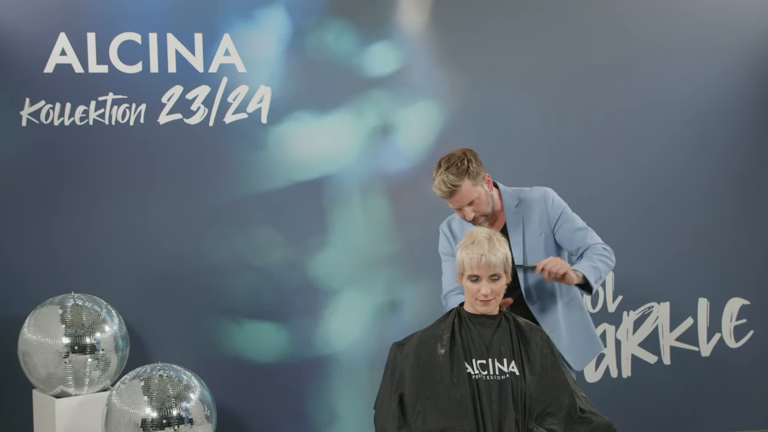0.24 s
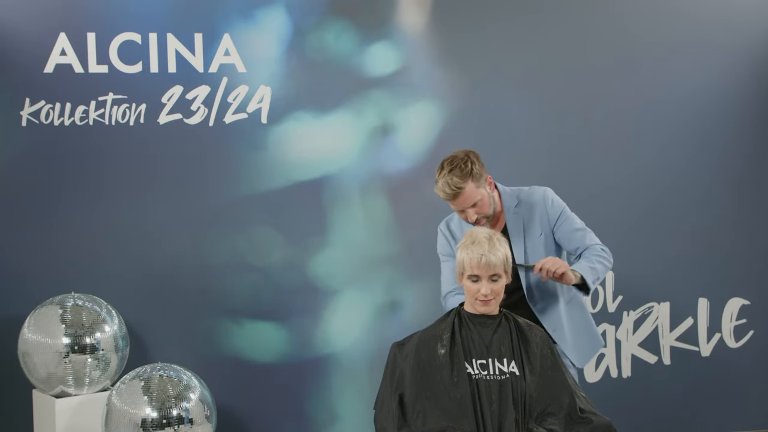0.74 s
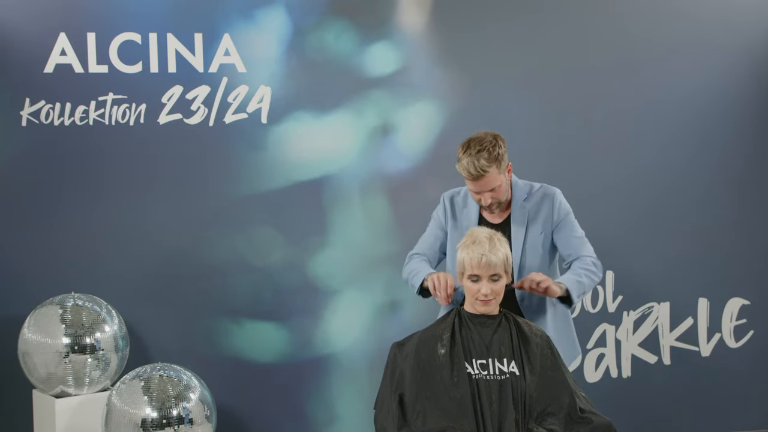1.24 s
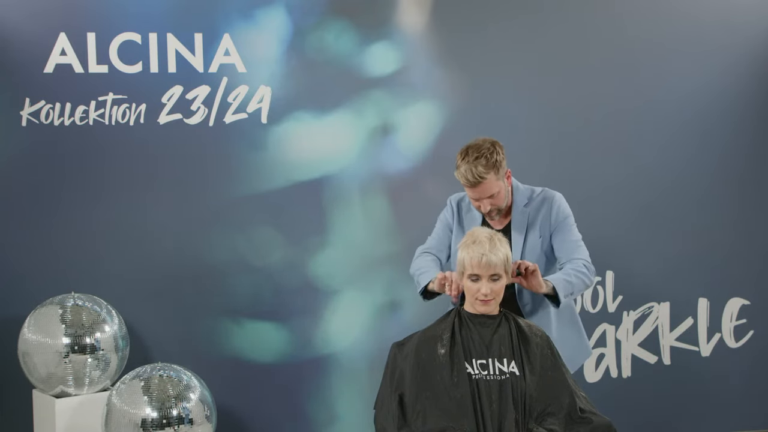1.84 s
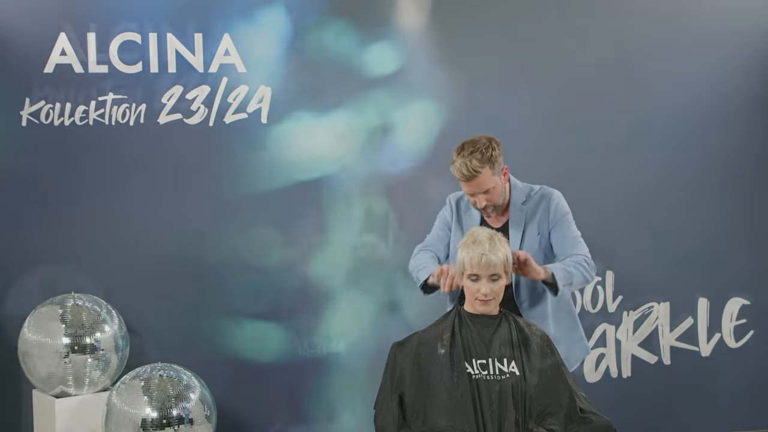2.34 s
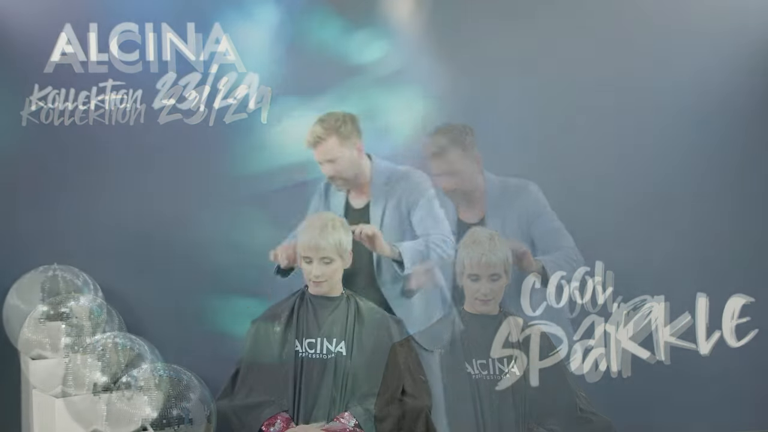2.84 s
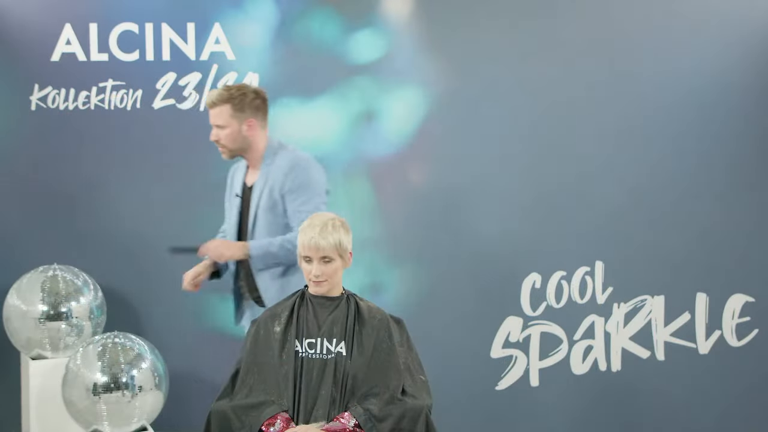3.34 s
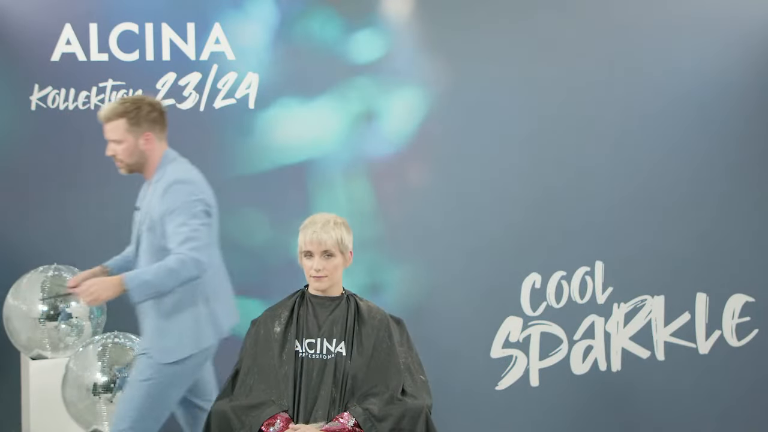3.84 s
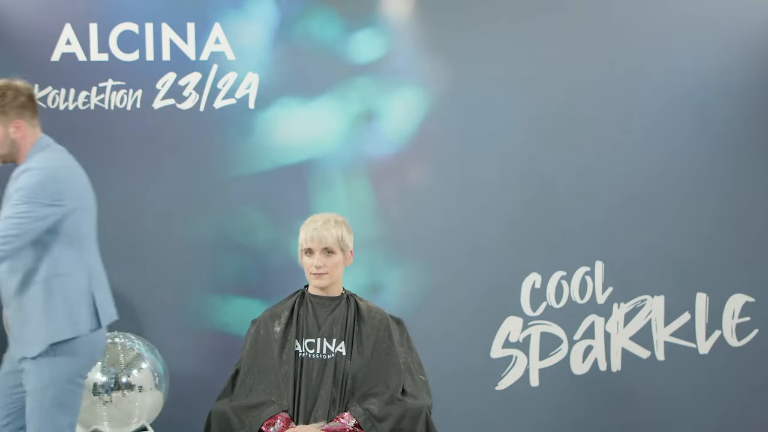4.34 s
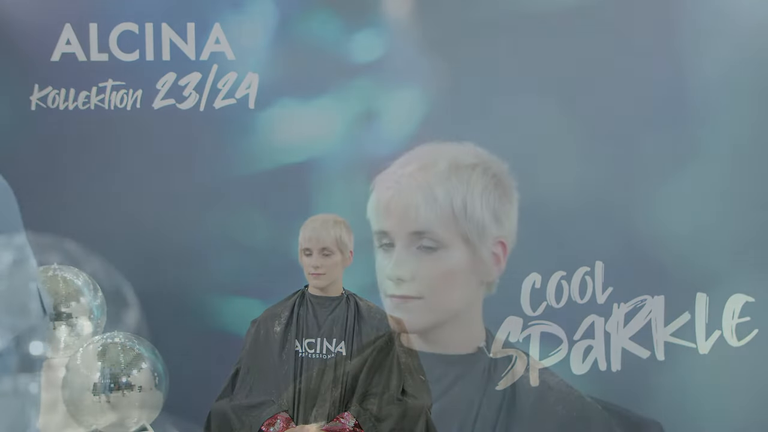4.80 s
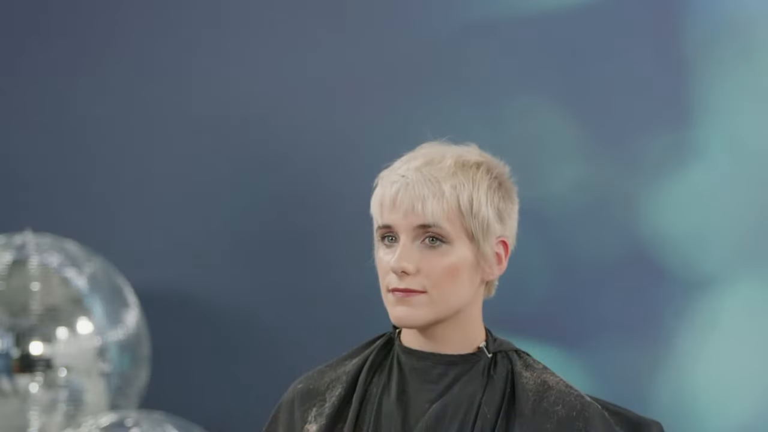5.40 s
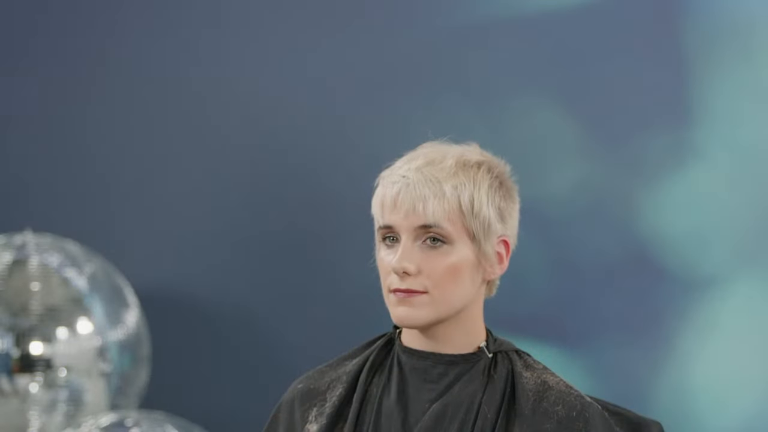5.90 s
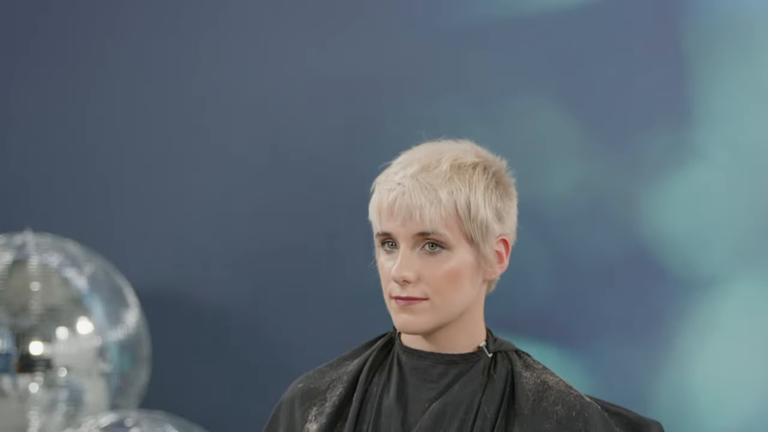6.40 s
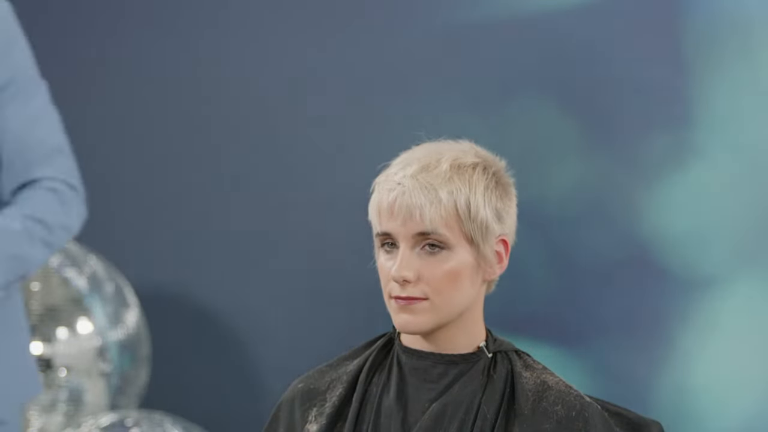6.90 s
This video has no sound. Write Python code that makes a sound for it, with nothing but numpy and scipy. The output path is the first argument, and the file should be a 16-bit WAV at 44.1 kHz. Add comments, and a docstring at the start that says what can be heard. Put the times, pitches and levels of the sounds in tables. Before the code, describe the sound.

A close microphone catches delicate hair cutting: short metallic rasps that swell to a snip, some with a bright ping, and soft sleeve and comb brushing. A sharp, bright click marks the end of cutting. Then tools are handled on a hard surface, sparse knocks growing into an irregular clatter with fabric rustle, small squeaks and a dominant heavy clack, fading to muted bumps in a quiet room.

```python
"""Hair cutting and tools on a tray

Scissors snip short hair in a quiet studio: grinding noise swells to a bite, the steel pings, a thud sits
under it and the blades slide open again. Comb clicks and hissing combing strokes come between the cuts.
Then tools knock on a hard tray, as impacts and chatter through resonances, with one heavy clack.
Cloth rustles and tools jostle in bouts, with rubs, squeaks and soft low bumps; a noise-built room answers
lightly over steady air and low rumble."""
import sys
import numpy as np
from scipy import signal
from scipy.fft import rfft, irfft, next_fast_len
from scipy.io import wavfile
from scipy.ndimage import map_coordinates

SR = 44100
rng = np.random.default_rng(int(sys.argv[2]) if len(sys.argv) > 2 else 0)


def to_wav(s):
    """Save 16-bit WAV."""
    ch = np.atleast_2d(s).T  # columns
    pcm = np.round(np.clip(ch, -1, 1) * 32767)  # PCM
    wavfile.write(sys.argv[1], SR, pcm.astype(np.int16))


N = 315315

TOP_HZ = 15700  # band limit of the whole sound
SPAN = SR // 8  # samples in one short event
T = np.arange(SPAN) / SR
MIDDLE = T[-1] / 2  # s

# light tools knock on the tray: [t/s, rattle time/s, body level/dB, clack over body/dB, edge over body/dB]
KNOCKS = [(2.936, 0.0025, -53, -23.5, -22), (3.36, 0.013, -55, -2, -7), (3.821, 0.0055, -63, -8, -39),
          (3.975, 0.001, -59.5, -29, -10.5), (4.387, .001, -51.5, -45, -32),
          (4.578, 0.0074, -50, -12.5, -13.5), (4.643, 0.0074, -51.5, -8, -10.5),
          (4.704, 0.013, -47, -20, -31), (4.7705, 0.0064, -43.5, -1, -17.5), (4.815, .007, -45.5, -3, -25),
          (5.1025, 0.0077, -40.5, -0.5, -15), (5.216, 0.0081, -45, -16, -30), (5.367, 0.013, -47, -20, -23),
          (5.398, 0.0059, -47.5, -10, -8.5), (5.471, 0.0067, -51.5, -18, -12.5),
          (5.79, 0.0052, -42.5, -7, -10.5), (5.831, 0.0096, -42, -3.5, -9),
          (5.836, 0.0078, -34.5, -36, -30), (5.887, 0.012, -42, -2, -12), (6.026, 0.014, -40, -8, -11),
          (6.088, 0.0098, -41, -4, -16), (6.203, 0.0069, -52.5, -4.5, -19), (6.255, 0.018, -40, -9, -12),
          (6.28, 0.015, -33.5, -6, -20), (6.633, 0.0035, -53.5, -2, -3.5), (6.664, 0.0071, -42, -6.5, -28),
          (6.690, 0.016, -43.5, -9.5, -18.5)]
# a heavy tool is set down: [t/s, rattle time/s, body level/dB, clack over body/dB, edge over body/dB]
CLACK = [(6.354, 0.0052, -22, -3.5, -13)]
# resonances of the tray: [f/Hz, width/Hz, level/dB]
TRAY = [(131, 84, -14), (272, 45, -1.5), (374.4, 190, 0.5), (488, 165, 5), (611, 144, 0), (756, 82, 0.5),
        (1154, 157, -7), (1241, 62, -2), (1645, 460, -6.5), (1900, 37, -13), (2907, 250, -10.5),
        (3580, 110, -5.5), (4230, 830, -17), (7210, 360, -40), (7660, 2800, -39)]
# resonances of the heavy tool: [f/Hz, width/Hz, level/dB]
HEAVY = [(208, 170, -13.5), (331, 87, 3), (442, 75, -3), (558, 20, -20.5), (674, 89, -5), (900, 240, -4.5),
         (1240, 160, -7.5), (1532, 24, 3.5), (1704, 60, -1), (2024, 58, 2.5), (2650, 90, -4.5),
         (3650, 130, -3), (5780, 480, -16.5), (7950, 150, -9.5), (10700, 500, -21)]
# bouts of handling cloth and tools: [start of hold t/s, hold length/s, level/dB]
HANDLING = [(4.557, 0.37, -56.5), (5.254, .23, -51.5), (5.81, .89, -44.5), (6.883, 0.098, -56)]


def amp(db):
    """Decibels to gain."""
    return 10 ** (np.asarray(db) / 20)


def unit(x):
    """Scale to rms 1."""
    return x / np.sqrt(np.mean(x ** 2) + 1e-20)


def burst(x, db):
    """Give a short sound the energy of 20 ms at this rms level."""
    return x * amp(db) * np.sqrt(SR / 50 / (np.sum(x ** 2) + 1e-20))


def along(points, hz):
    """Interpolate (Hz, value) points on a log frequency axis."""
    f, v = np.transpose(points)
    return np.interp(np.log(hz + 1), np.log(f + 1), v)


def wobble(rate):
    """A smooth random curve, rate knots a second."""
    knots = rng.standard_normal(int(N * rate / SR) + 4)
    return map_coordinates(knots, [np.arange(N) * rate / SR])


def filtered(x, response):
    """Multiply the spectrum of x by a response of frequency."""
    size = next_fast_len(len(x) + SPAN)
    spectrum = rfft(x, size) * response(np.fft.rfftfreq(size, 1 / SR))
    return irfft(spectrum, size)[:len(x)]


def coloured(x, points):
    """Shape x by a (Hz, dB) spectrum."""
    return filtered(x, lambda hz: amp(along(points, hz)))


def band(x, lo_hz, hi_hz, order=3):
    """Causal band-pass."""
    sos = signal.butter(order, [lo_hz, hi_hz], "band", fs=SR, output="sos")
    return signal.sosfilt(sos, x)


def ring(x, modes, direct_db):
    """Drive a body's resonances with x and keep some of the bare contact."""
    def response(f):
        total = amp(direct_db)
        for k, (centre, width, db) in enumerate(modes):
            resonance = 1j * f * width / (centre * centre - f * f + 1j * f * width)
            total = total + (-1) ** k * amp(db) * resonance  # neighbours in opposite phase
        return total
    return filtered(x, response)


def grains(count, rate, spread_db):
    """Tiny slips at random moments, rate per second and of random sizes, rms 1."""
    chance, size, sign = rng.random(count), rng.standard_normal(count), rng.standard_normal(count)
    return unit((chance < rate / SR) * amp(spread_db * size) * np.sign(sign))


def contact(rattle_s, first_db):
    """The force of a blow: a first impact, then chatter that dies away."""
    force = grains(SPAN, 5000, 3.8) * np.exp(-T / max(rattle_s, 1e-4)) * (1 - np.exp(-T / 0.00028))
    force /= np.linalg.norm(force) + 1e-12
    force[0] -= amp(first_db)  # relative to the whole chatter
    return force


def add(track, s, x):
    """Mix x into the track at time s."""
    start = max(round(s * SR), 0)
    part = track[start:start + len(x)]
    part += x[:len(part)]


def bouts(rows, attack_s, release_s):
    """Gain of a series of movements: each one swells, holds and dies away."""
    t = np.arange(N) / SR
    gains = []
    for s, length, db in rows:
        before, after = np.maximum(s - t, 0), np.maximum(t - s - length, 0)
        gains.append(amp(db) * np.exp(-before / attack_s - after / release_s))
    return np.max(gains, axis=0)


def moments(per_s):
    """Uneven moments within the bouts of handling: (s, dB of the bout, chance from -1 to 1)."""
    rows = []
    for start, length, db in HANDLING:
        slots = np.arange(start, start + length, 1 / per_s)
        for s, (late, size) in zip(slots, rng.random((len(slots), 2))):
            rows.append((s + late / per_s, db, 2 * size - 1))
    return [row for row in rows if row[0] < N / SR]


def air():
    """Steady coloured noise as room air, over a slowly changing rumble that swells once."""
    # spectrum of the air: [f/Hz, level/dB]
    air_tone = [(59, -27), (100, -3.5), (202, -2.5), (239, -0.5), (283, -6), (424, -7), (891, -10),
                (1060, -13.5), (6020, -25), (12400, -29.5), (16000, -29.5)]
    # level of the low rumble before its swell: [t/s, level/dB]
    rumble_level = [(0.0, -70), (2.5, -71), (3.1, -68.5), (7.15, -67)]
    # spectrum of the rumble: [f/Hz, level/dB]
    rumble_tone = [(15, -9), (32, -4.5), (50, 4), (80, -4), (130, -6.5), (250, -29.5), (600, -79.5)]
    air_db = -68.5
    swell_s, swell_half_s, swell_db = 6.9, 0.13, 11  # around the last bumps
    t = np.arange(N) / SR
    rumble_db = np.interp(t, *np.transpose(rumble_level))
    rumble_db = rumble_db + swell_db * np.exp(-((t - swell_s) / swell_half_s) ** 2)
    rumble = amp(rumble_db) * unit(coloured(rng.standard_normal(N), rumble_tone))
    return rumble + amp(air_db) * unit(coloured(rng.standard_normal(N), air_tone))


def room(x):
    """Near walls answer in a dense flurry; a diffuse tail follows, lasting longest around 2 kHz."""
    # time to decay by 60 dB: [f/Hz, time/s]
    decay_times = [(150, .5), (500, 0.34), (2000, 0.92), (6000, 0.53), (14000, 0.41)]
    # spectrum of the answer: [f/Hz, level/dB]
    answer_tone = [(60, -11), (150, -20), (280, -0.5), (450, -8.5), (1000, -10), (3000, -14.5), (6000, -14),
                   (14000, -10.5)]
    hz, t, noise = signal.stft(rng.standard_normal(SR), SR, nperseg=256)
    decay = amp(-60 * t / along(decay_times, hz)[:, None]) * (1 - np.exp(-t / 0.0013))
    decay /= np.sqrt(np.sum(decay ** 2, axis=1, keepdims=True))  # equal energy at every frequency
    tail = signal.istft(noise * decay, SR, nperseg=256)[1]
    tail /= np.linalg.norm(tail)
    flurry = band(grains(SPAN, 2500, 3), 1500, 13000, order=1) * T ** 2 * np.exp(-T / 0.0054)
    add(tail, 0, amp(-2.0) * flurry / np.linalg.norm(flurry))
    return signal.fftconvolve(coloured(x, answer_tone), tail)[:N]


def bumps():
    """Each bump is about one swing of low pressure: a sine that swells and dies at once."""
    # soft low bumps, starting 3 ms ahead of t: [t/s, f/Hz, level/dB]
    bump_rows = [(3.08, 58, -63), (3.822, 198, -57), (3.876, 50.5, -58), (4.589, 132, -53),
                 (6.831, 80, -53.5), (6.902, 68.6, -44.5), (6.965, 65, -51.5)]
    out = np.zeros(N)
    for s, hz, db in bump_rows:
        add(out, s - .003, burst(np.sin(2 * np.pi * hz * T) * T * np.exp(-T / 0.0059), db))
    return out


def cloth():
    """Fabric rubs in uneven pushes and its folds crinkle: sparse slips in a low and a high band."""
    # spectrum of the cloth: [f/Hz, level/dB]
    cloth_tone = [(71, -29), (120, -3.5), (360, 1.5), (598, -2), (812, -6.5), (899, -4), (1430, -14.5),
                  (2160, -10.5), (2490, -14), (3170, -23), (3660, -22), (14300, -39.5), (15500, -28)]
    rub_db, crinkle_db = -9, -22.5  # relative to the bout
    effort = bouts(HANDLING, attack_s=0.079, release_s=.16)
    push = wobble(51)
    rub = unit(band(coloured(grains(N, 2500, 2.8), cloth_tone), 205, 2000))
    crinkle = unit(band(coloured(grains(N, 2900, 3.6), cloth_tone), 2400, TOP_HZ))
    return effort * (rub * amp(rub_db + 2 * push) + crinkle * amp(crinkle_db + 2.2 * push))


def flecks():
    """Tools being handled give tiny decaying sine ticks, each at its own pitch."""
    per_s, centre_hz, decay_s = 91, 10040, 0.0009
    fleck_db, spread_db = -28, 6  # relative to the bout
    out = np.zeros(N)
    for s, db, size in moments(per_s):
        hz = min(centre_hz * np.exp(0.58 * rng.standard_normal()), rng.uniform(0.99, 1) * TOP_HZ)
        tick = np.sin(2 * np.pi * hz * T) * np.exp(-T / decay_s)
        add(out, s, burst(tick, db + fleck_db + spread_db * size))
    return out


def blows(rows, modes, direct_db, first_db):
    """Each blow rings the body; its row sets how much clack and edge the contact gives."""
    out = np.zeros(N)
    for s, rattle_s, db, clack_db, edge_db in rows:
        # a long rattle is a glancing contact with a weak first impact
        firm_db = first_db - 1100 * rattle_s
        weight = ring(contact(rattle_s, firm_db), modes, direct_db)
        # the light chatter of the edges shows most in the treble
        chatter = ring(contact(rattle_s, firm_db - 7), modes, direct_db)
        body = burst(band(weight, 120, 1000, order=2), db)
        clack = burst(band(band(weight, 1535, 5500), 550, 2730, order=1), db + clack_db)
        edge = burst(band(band(chatter, 6000, 15000), 2000, 10000, order=1), db + edge_db)
        add(out, s, body + clack + edge)
    return out


def jostle():
    """While they are handled, the tools touch lightly, ringing the tray's resonances."""
    per_s, rattle_s = 24, 0.0027
    touch_db, spread_db = -13.5, 11  # relative to the bout
    clack_db, edge_db = -5, -25  # relative to the touch
    rows = []
    for s, db, size in moments(per_s):
        rows.append((s, rattle_s, db + touch_db + spread_db * size, clack_db, edge_db))
    return blows(rows, TRAY, direct_db=-22, first_db=3)


def tools():
    """Light tools clatter on the tray; the heavy one echoes dully off the floor and a wall."""
    light = blows(KNOCKS, TRAY, direct_db=-20, first_db=7)
    heavy = blows(CLACK, HEAVY, direct_db=-21, first_db=11)
    dull = band(heavy, 340, 900, order=1)
    add(heavy, .0152, amp(-10) * dull)
    add(heavy, .0493, amp(-15.0) * dull)
    return light + heavy


def squeaks():
    """Brief stick and slip: a slightly unsteady gliding tone."""
    # small rubs that squeak: [t/s, length/s, start f/Hz, end f/Hz, level/dB]
    squeak_rows = [(2.272, 0.065, 7850, 7500, -74), (2.294, 0.058, 4830, 4400, -73),
                   (2.381, 0.036, 3920, 3810, -73), (3.363, 0.091, 1244, 1650, -59),
                   (4.416, 0.034, 2870, 2840, -59.5), (5.41, 0.032, 7100, 6700, -68)]
    out = np.zeros(N)
    for s, length, from_hz, to_hz, db in squeak_rows:
        progress = np.clip(T / length, 0, 1)
        waver = 1 + .055 * unit(band(rng.standard_normal(SPAN), 40, 700))
        hz = (from_hz + (to_hz - from_hz) * progress) * waver
        tone = np.sin(2 * np.pi * np.cumsum(hz) / SR)
        add(out, s, burst(np.sin(np.pi * progress) * tone, db))
    return out


def scrapes():
    """Little slips swell and fade through the tray's resonances as something slides over it."""
    # slides and brushes: [middle t/s, half length/s, rub level/dB, hiss level/dB]
    scrape_rows = [(0.808, 0.071, -55.5, -66.5), (2.65, 0.034, -58, -57.5), (4.43, 0.041, -57.5, -62),
                   (4.849, 0.071, -51.5, -87), (5.27, 0.064, -59.5, -75), (5.45, 0.014, -57, -62),
                   (5.797, 0.026, -48.5, -58.5), (5.942, 0.023, -47.5, -60.5), (6.649, 0.023, -46.5, -56)]
    out = np.zeros(N)
    for s, half, rub_db, hiss_db in scrape_rows:
        slips = grains(SPAN, 1600, 5) * np.exp(-((T - MIDDLE) / half) ** 2)
        sound = ring(slips, TRAY, direct_db=-25.0)
        rub = burst(band(sound, 150, 1800, order=2), rub_db)
        hiss = burst(band(sound, 2600, TOP_HZ, order=2), hiss_db)
        add(out, s - MIDDLE, rub + hiss)
    return out


def combing():
    """Sleeves brush softly while hair hisses through the comb's teeth: sparse slips in two bands."""
    # passes of the comb: [start of hold t/s, hold length/s, level/dB]
    passes = [(0.02, 0.18, -67.5), (1.13, 0.18, -63), (2.26, 0.8, -68), (2.76, 0.28, -61.5),
              (3.85, 0.12, -66)]
    # spectrum of the passes: [f/Hz, level/dB]
    pass_tone = [(88, -67), (150, 1.5), (346, 2), (540, -4.5), (595, -9), (766, -8), (1540, -13),
                 (1760, -14), (3220, -22), (3830, -23.5), (5440, -26.5), (6860, -26), (9540, -29.5),
                 (12000, -28), (15500, -35.5)]
    sleeve_db, hair_db = -3, -12  # relative to the pass
    effort = bouts(passes, attack_s=0.1, release_s=0.27)
    folds, hairs = grains(N, 4000, 4.5), grains(N, 9000, 4)
    sleeve = unit(band(coloured(folds, pass_tone), 170, 3000, order=2))
    hiss = unit(band(coloured(hairs, pass_tone), 3500, TOP_HZ))
    sleeve_gain = amp(sleeve_db + 2.2 * wobble(25))
    hiss_gain = amp(hair_db + 2.4 * wobble(37))
    return effort * (sleeve * sleeve_gain + hiss * hiss_gain)


def strands(hz, width, count):
    """Thin rough tones that wander about one resonance and take turns."""
    wander_share, rough_hz = .3, 200  # slow drift as a share of the width; fast flutter
    pitches = [hz + width * wander_share * wobble(4) + rough_hz * wobble(630) for _ in range(count)]
    tones = [amp(7.9 * wobble(16)) * np.sin(2 * np.pi * np.cumsum(pitch) / SR) for pitch in pitches]
    return unit(sum(tones))


def teeth():
    """Hair drawn taut through the comb sings in thin strands that come and go."""
    # draws through the teeth: [start of hold t/s, hold length/s, level/dB]
    draws = [(2.26, 0.34, -74), (2.8, 0.094, -68), (3.12, 0.082, -73)]
    # resonances of the song: [f/Hz, width/Hz, level/dB]
    song_modes = [(3960, 200, -1.5), (4590, 250, -2.5), (6870, 766, 4.5), (7300, 300, -6.5),
                  (8730, 510, -8.5)]
    song = sum(amp(db) * strands(hz, width, count=4) for hz, width, db in song_modes)
    return unit(song) * bouts(draws, attack_s=.04, release_s=.06)


def comb_ticks(direct_db, first_db):
    """Comb against scissors: hard, very short clicks with a thin steel ring of narrow-band noise."""
    # clicks: [t/s, level/dB]
    tick_rows = [(1.0834, -65.5), (1.103, -72), (2.771, -60), (2.781, -50), (3.2658, -29)]
    # resonances of the comb: [f/Hz, width/Hz, level/dB]
    comb_modes = [(1935, 300, 2.5), (3600, 150, 9.5), (4600, 250, 5), (5300, 350, 9), (6830, 550, 6.5),
                  (9670, 440, 10), (10680, 350, 8), (11800, 880, 9.5), (14400, 900, 3.5)]
    out = np.zeros(N)
    t = np.arange(SR // 2) / SR
    for s, db in tick_rows:
        struck = ring(contact(0.0019, first_db), comb_modes, direct_db)
        click = burst(band(struck, 1464, 11000, order=1), db)
        push = burst(band(np.exp(-T / .00025), 40, 1100, order=1), db - 17.5)
        steel = unit(band(rng.standard_normal(len(t)), 5150, 5650, order=1))
        add(out, s, click + push)
        add(out, s, steel * amp(db - 30 - 60 * t / 0.91))  # falls 60 dB in 0.91 s
    return out


def hair_snaps(rise, count):
    """Single hairs part with tiny high pings around the strongest bite, the last 14 ms after it."""
    when, pitch, size = rng.exponential(1, count), rng.standard_normal(count), rng.standard_normal(count)
    start = MIDDLE + 0.014 - rise * when[:, None]
    age = np.maximum(T - start, 0)
    hz = np.clip(10800 * np.exp(.25 * pitch), 4000, TOP_HZ)[:, None]
    pings = np.sin(2 * np.pi * hz * age) * np.exp(-age / .0013)
    return amp(3 * size - 3 * when) @ pings  # earlier snaps tend to be softer


def stroke(rise_s, db, rasp_db):
    """The edges grind harder up to the strongest bite, mid-span; each slip rings the steel briefly."""
    # the steel's colour: [f/Hz, level/dB]
    blade_tone = [(1300, -18.5), (2700, -6.5), (4000, -14.5), (6000, -2.5), (8500, -3.5), (10500, -7),
                  (12700, 5), (15500, -5)]
    grit_db, snaps_db = 2, -6  # uneven catching; parting hairs relative to the stroke's level
    swell = np.exp(np.minimum((T - MIDDLE) / (0.57 * rise_s), (MIDDLE - T) / 0.0019))
    catches = amp(grit_db * unit(band(rng.standard_normal(SPAN), 60, 330, order=2)))
    slips = grains(SPAN, 3000, 3.5) * swell * catches
    steel = rng.standard_normal(SPAN) * np.exp(-T / .0016)  # a new ring for every stroke
    bite = coloured(signal.fftconvolve(slips, steel)[:SPAN], blade_tone)
    rasp = burst(band(bite, 1000, 4500), db + rasp_db)
    bright = burst(band(bite, 6700, TOP_HZ), db + 3.2)
    return rasp + bright + burst(hair_snaps(rise_s, count=24), db + snaps_db)


def scissors():
    """A cut swells to the stop, where the steel pings and the hand thuds; then the blades reopen lightly."""
    # full cuts, timed where the blades meet their stop: [t/s, rise scale/s, stroke level/dB,
    # rasp over stroke/dB, click level/dB, ping level/dB, played 3 dB lower as energy over 20 ms]
    snips = [(0.4306, .018, -62.5, -9, -61.5, -88), (0.684, 0.015, -59, -3, -57.5, -83),
             (0.905, 0.017, -63.5, -10, -72, -89), (1.741, .024, -56.5, -6, -64, -53),
             (1.994, .03, -54, -12.5, -92, -55), (2.673, 0.014, -53.5, -13, -72, -61)]
    # light strokes that do not reach the stop: [t/s, level/dB]
    trims = [(0.093, -74), (1.095, -67), (1.333, -69), (1.479, -71), (2.221, -72.5), (2.481, -68),
             (2.872, -61.5)]
    bite_lead_s = 0.0021  # a cut bites hardest just before the stop
    thud_db = -6.5  # relative to the stroke
    ping_hz = 9280  # the blade's clearest mode
    reopen_s, reopen_db = .128, -71  # after every cut
    out = np.zeros(N)
    for s, rise_s, db, rasp_db, click_db, ping_db in snips:
        add(out, s - bite_lead_s - MIDDLE, stroke(rise_s, db, rasp_db))
        click = burst(band(contact(0.0015, first_db=-3), 820, TOP_HZ, order=1), click_db)
        thud = burst(band(contact(0.011, first_db=16), 285, 640, order=2), db + thud_db)
        ping = np.sin(2 * np.pi * ping_hz * T) * amp(-60 * T / 0.028)  # falls 60 dB in 28 ms
        add(out, s, click + thud + burst(ping, ping_db - 3))
    reopenings = [(s + reopen_s, reopen_db) for s, *_ in snips]
    for s, db in reopenings + trims:
        add(out, s - MIDDLE, stroke(rise_s=0.013, db=db, rasp_db=-9))
    return out


def scene():
    """The cutting is close and fairly dry; the tray stands further into the room."""
    rubbing = scissors() + squeaks() + scrapes()
    near = rubbing + comb_ticks(direct_db=-14, first_db=6) + tools()
    # the room gathers sound from all sides of each object, so single resonances stand out less
    ticks = comb_ticks(direct_db=0, first_db=20)
    knocks = blows(KNOCKS, TRAY, direct_db=-5, first_db=24)
    clack = blows(CLACK, HEAVY, direct_db=0, first_db=28)
    reverb = room(amp(-10) * rubbing + amp(-5) * ticks + knocks + amp(-1.4) * clack)
    hands = cloth() + combing() + teeth() + jostle() + flecks()
    return (near + reverb + hands + bumps() + air())[None]


def record(dry):
    """The recorder keeps almost nothing above its band limit: a very steep low-pass."""
    return filtered(dry[0], lambda hz: 1 / np.sqrt(1 + (hz / TOP_HZ) ** 160))[None]


dry = scene()
out = record(dry)
to_wav(out)
```